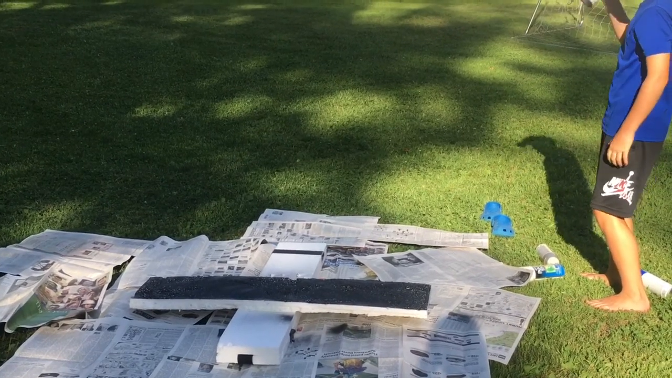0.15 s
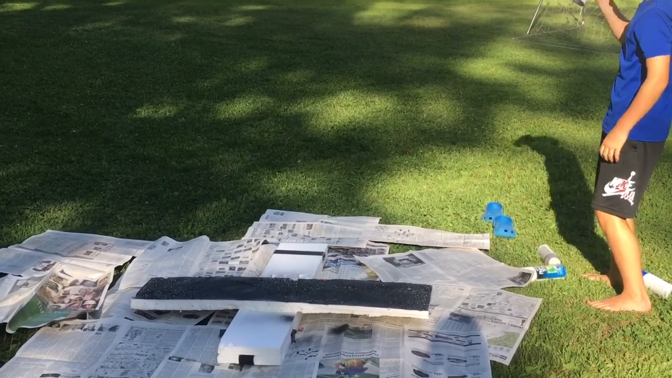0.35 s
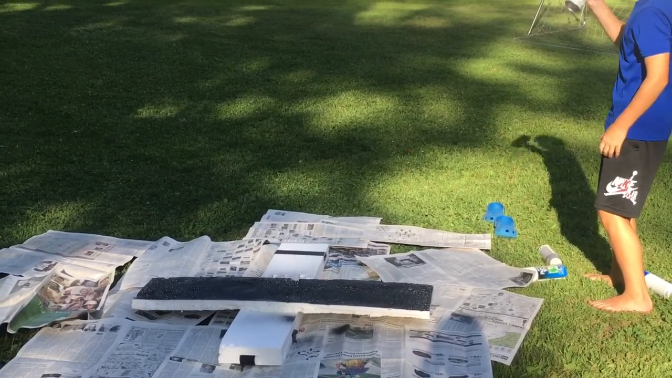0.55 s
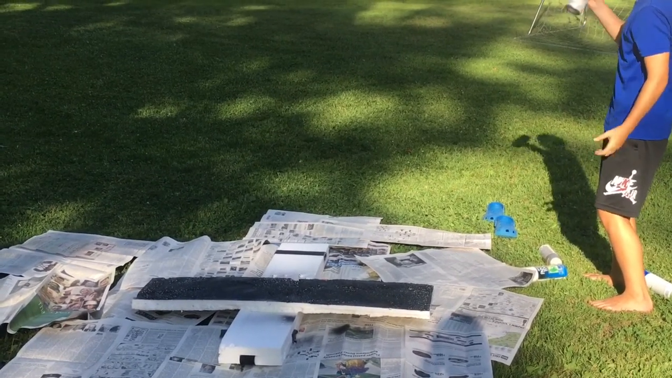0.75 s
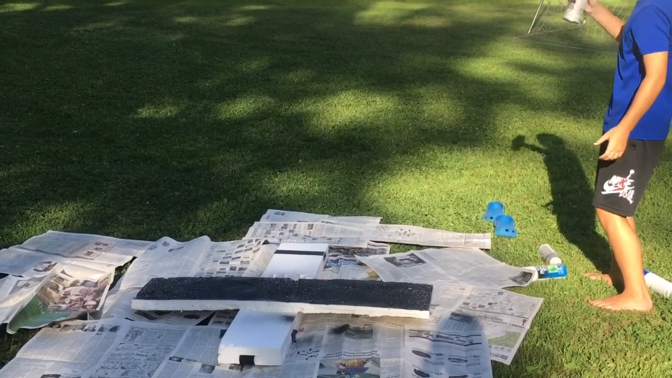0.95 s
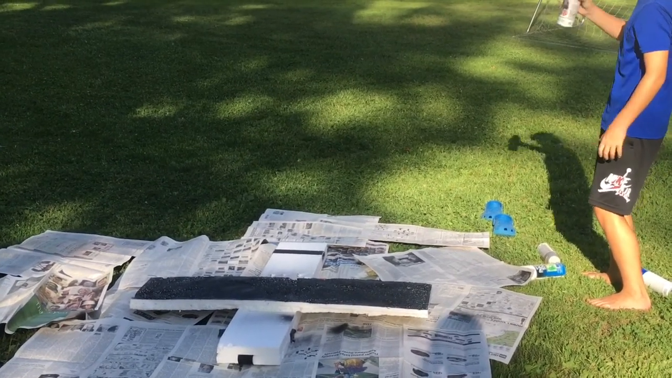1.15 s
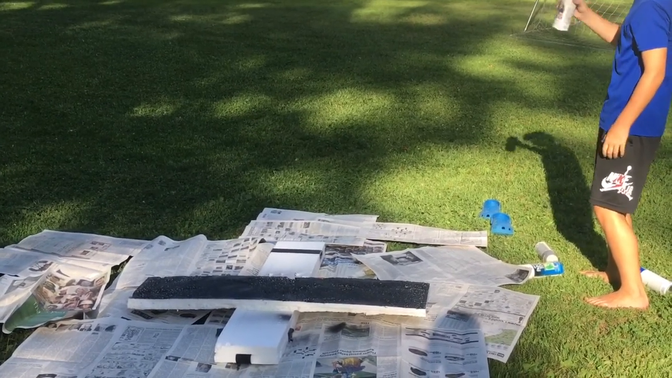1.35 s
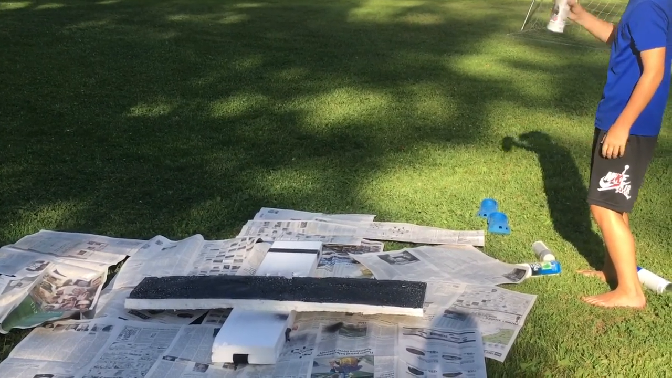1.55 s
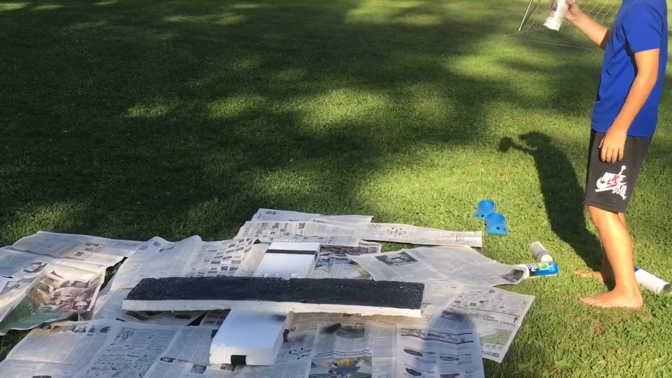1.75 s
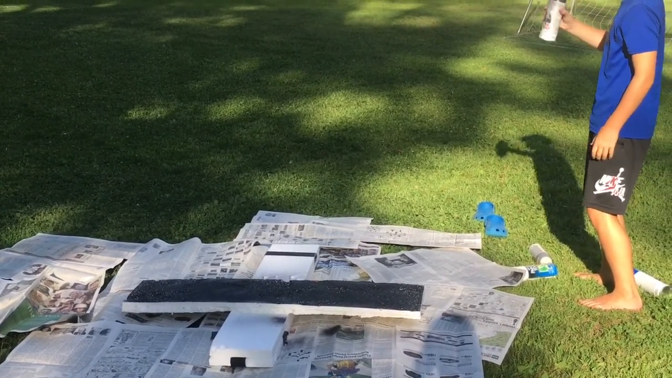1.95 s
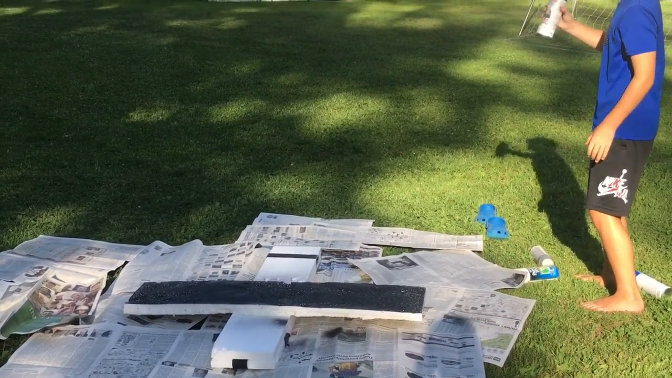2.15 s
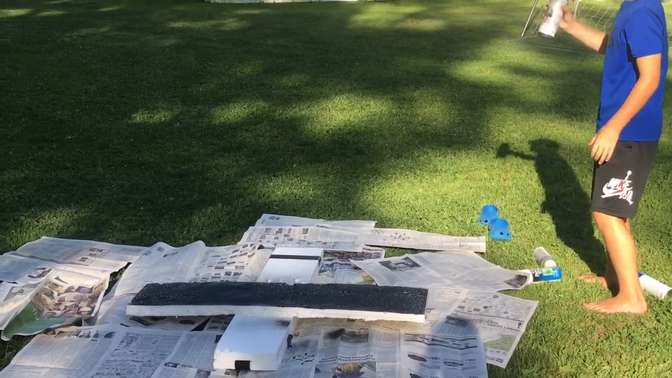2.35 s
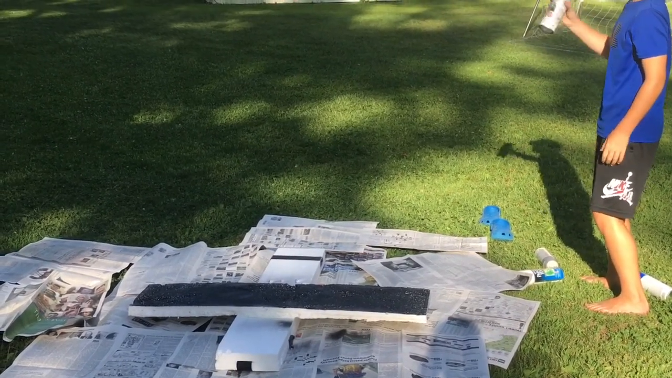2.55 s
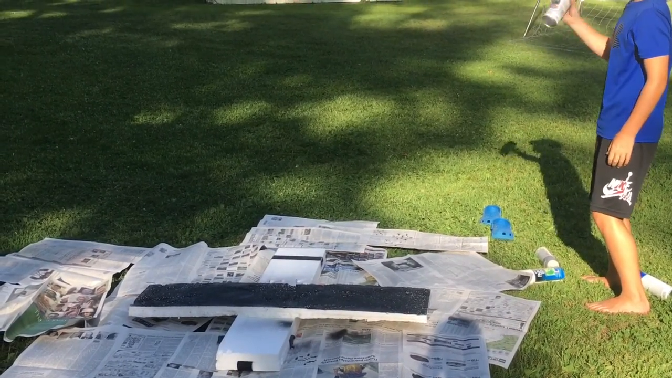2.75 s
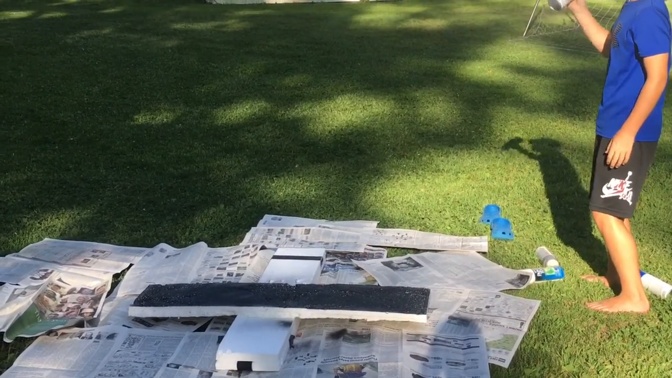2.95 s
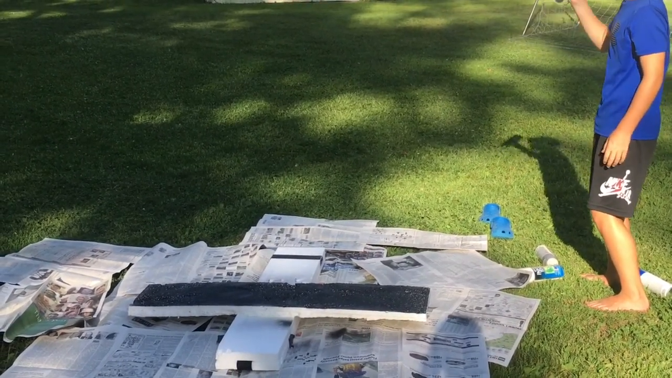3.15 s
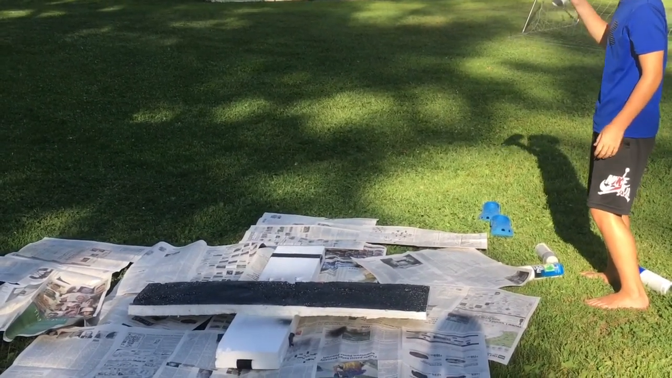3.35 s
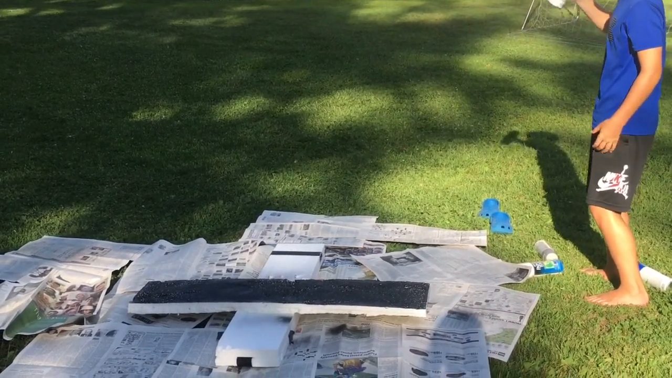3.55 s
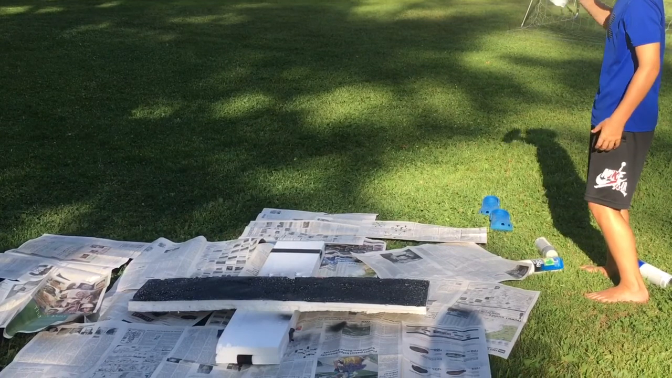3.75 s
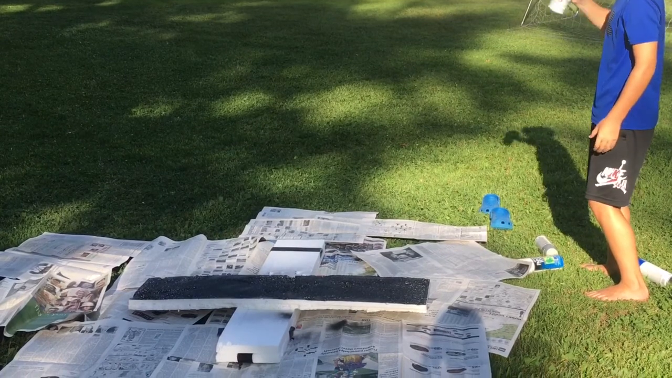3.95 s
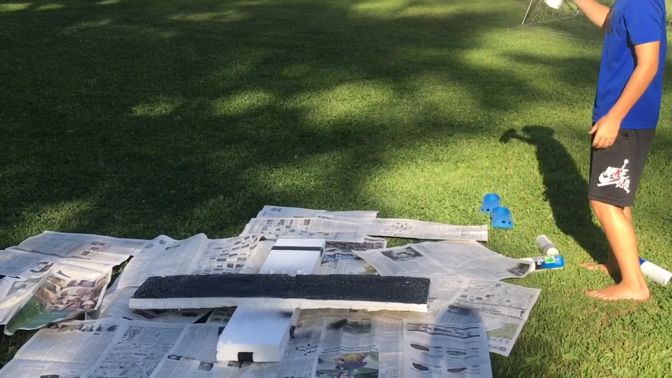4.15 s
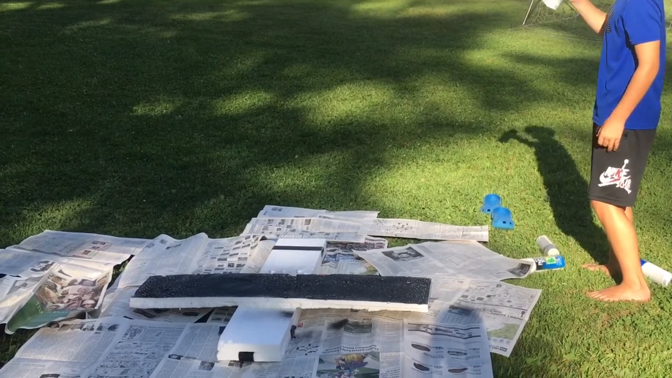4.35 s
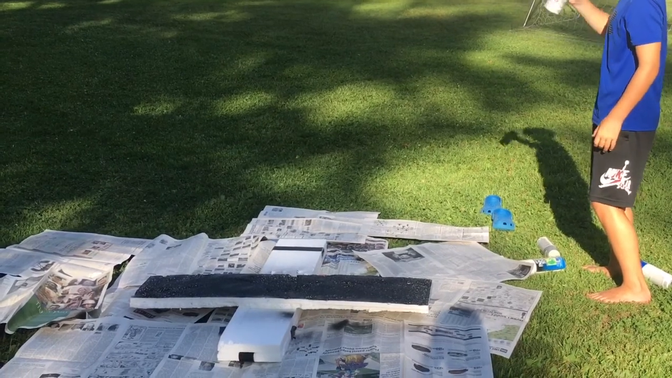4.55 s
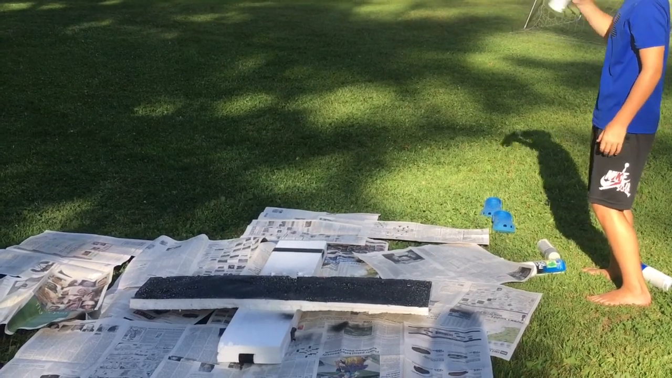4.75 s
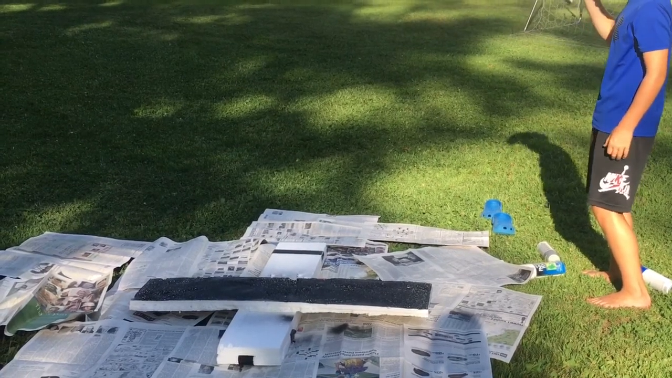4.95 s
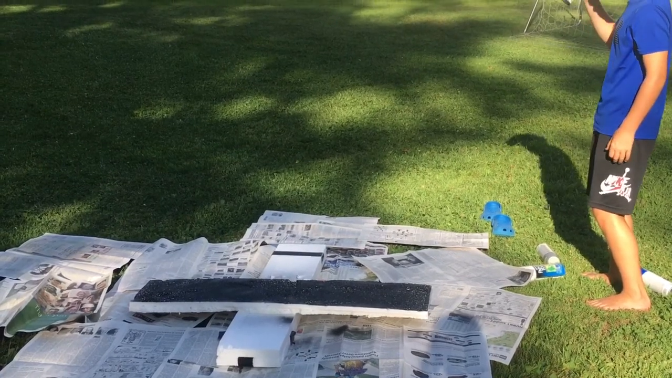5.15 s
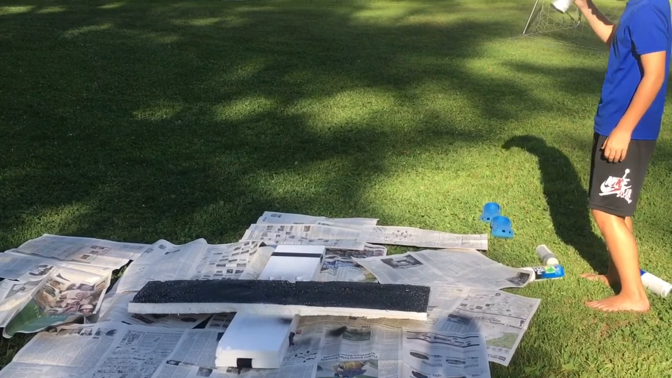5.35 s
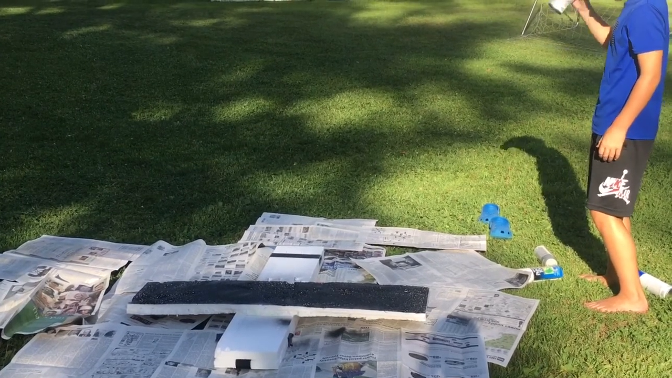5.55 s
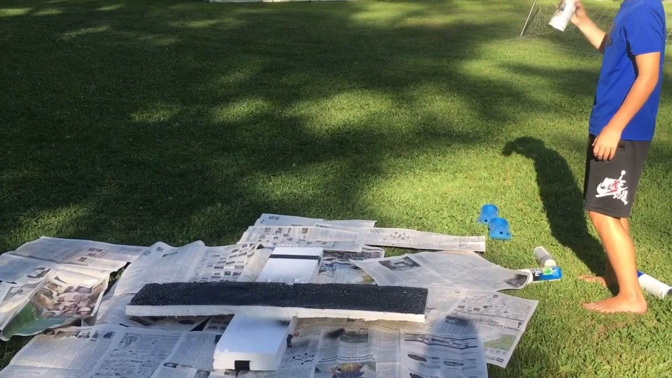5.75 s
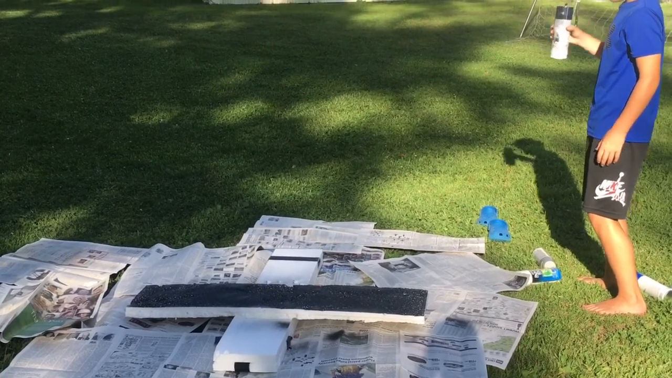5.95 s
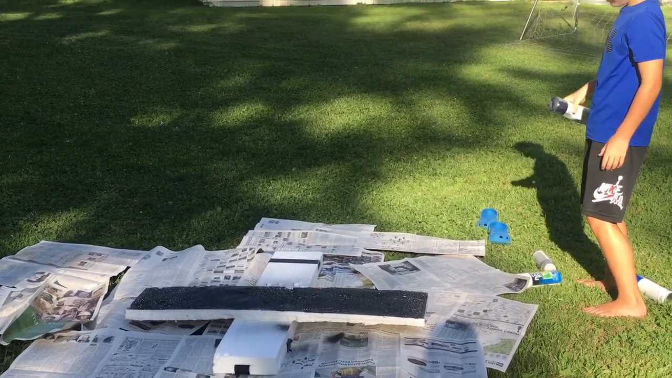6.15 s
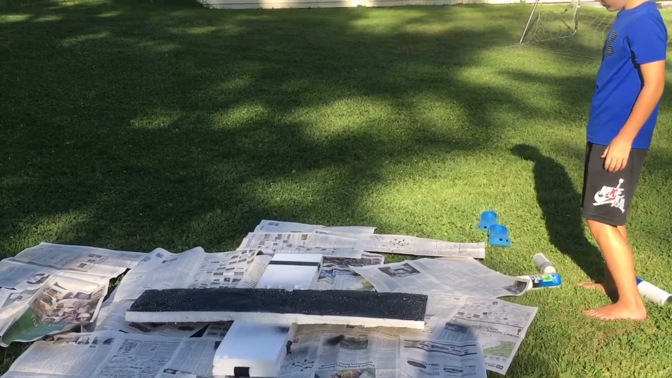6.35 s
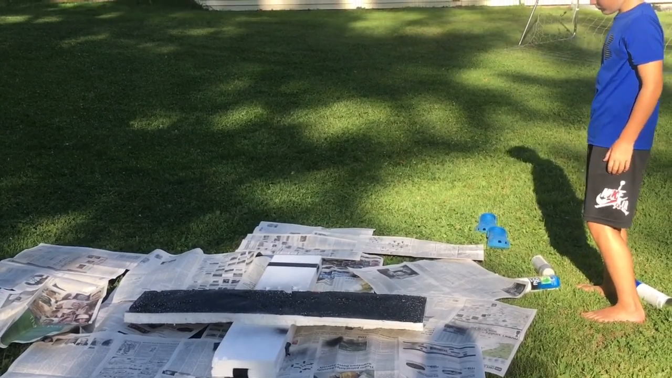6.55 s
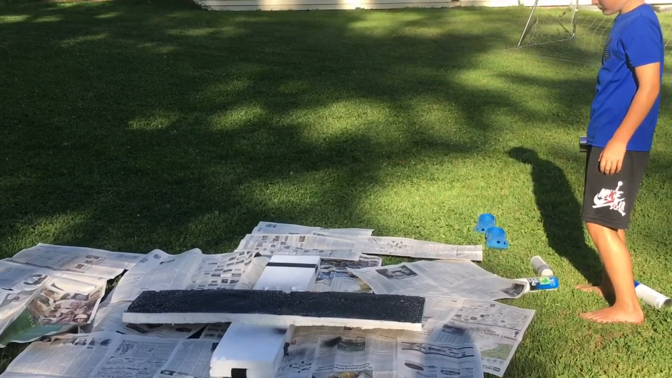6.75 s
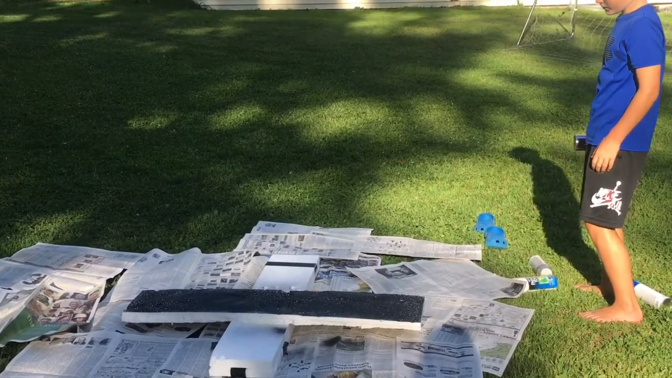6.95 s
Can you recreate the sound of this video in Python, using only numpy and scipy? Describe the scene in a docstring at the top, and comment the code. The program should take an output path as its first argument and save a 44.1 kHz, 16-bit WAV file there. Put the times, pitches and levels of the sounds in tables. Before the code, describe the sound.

Rapid metallic clacking of a mixing ball in a shaken paint can on a lawn, thinning out to quiet garden air and cricket chirps.

```python
"""In a garden, a spray paint can is shaken hard over a lawn; the knocks thin out and a last one follows alone.
The loose ball excites the can's damped modes: it cracks on the base, skips along the wall and knocks
into the shoulder, and each knock returns as an echo off the ground. It also rolls round the wall.
Paint sloshes as filtered bubble bursts, with fizz and spatter of shaped noise. A cricket chirps in sagging
tones, one soft peep sounds, and a machine's wavering sines hum far away in soft noise."""
import sys
import numpy as np
from scipy import signal
from scipy.fft import rfft, irfft
from scipy.io import wavfile
from scipy.ndimage import uniform_filter1d

SR = 44100
rng = np.random.default_rng(int(sys.argv[2]) if len(sys.argv) > 2 else 0)


def wrap_up_sound(samples):
    """Save the sound to the file named by the first command line argument, as 16-bit audio."""
    columns = np.atleast_2d(samples).T
    # keep every value between -1 and 1, then stretch to whole-number steps
    tamed = np.clip(columns, -1, 1)
    steps = np.round(tamed * 32767).astype(np.int16)
    wavfile.write(sys.argv[1], SR, steps)


N = 312669
TIME = np.arange(N) / SR

# Modes of the can: (mean frequency [Hz], relative level [dB], 60 dB decay time [s])
CAN_MODES = [(461, -13.5, 0.013), (1034, -5, 0.019), (1410, 4, 0.0085), (1676, 3, 0.0096),
             (1925, 2, 0.0059), (2350, 6, 0.01), (2723, -6, 0.019), (3130, 2.5, 0.0092), (3600, -3, 0.013),
             (3870, -2, 0.014), (4450, -17.5, 0.025), (5210, -3.5, 0.014), (6510, 13, 0.0034),
             (7170, 1.5, 0.015), (8380, 2.5, 0.0022), (9730, -6, 0.0084), (11260, 2.5, 0.0024),
             (13900, -8, 0.0034), (15800, 6.5, 0.00043)]
# Borders between wall, shell ring, dome, rim and tick zones of the spectrum: (frequency [Hz])
ZONE_EDGES_HZ = [400, 1800, 2800, 5200, 8000, 16000]
# Forward strokes, ball on the domed base; dome and tick are relative to the shell ring:
# (time [s], level [dB], end dome [dB], steel tick [dB], ground echo lag [ms])
BASE_CRACKS = [(.0108, -21, 2.5, -5, 2.4), (.3438, -27.5, -6.5, -13.5, 2.04), (.539, -28, -10.5, -11, 2.09),
               (0.753, -31.5, -5.5, -9, 2), (.953, -27.5, -6, -14.5, 2.35), (1.2908, -21, 4.5, -4.5, 2.3),
               (1.5182, -21.5, 1, -3, 2.3), (1.702, -21, -4, -7.5, 2.37), (1.9108, -20.5, 6, -10.5, 2.17),
               (2.1628, -26, 8, 2, 2.3), (2.348, -20, 6, 4, 2), (2.5385, -20.5, 0, -2, 2.32),
               (2.7878, -23.5, 6, -6.5, 2.77), (3.0007, -24.5, -1.5, -7.5, 2.5), (3.2077, -25, 4.5, 0, 2.7),
               (3.4045, -21.5, -5, -2.5, 2.43), (3.4104, -24.5, 3, -11, 2.44),
               (3.6356, -19, 4.5, -2.5, 2.5), (3.864, -18, 7, -6, 2.73), (4.0665, -19.5, 9, 3, 1.63),
               (4.7425, -25, -4, -4, 2.44), (4.9173, -21, 2.5, -16, 2.6), (5.1373, -22, 8.5, 3.5, 1.87),
               (5.3757, -33, -4, -16, 2.8), (5.5472, -19.5, 3, 1, 2.31), (6.8934, -40.5, -2, -2, 2.15)]
# Return strokes, ball into the shoulder: (time [s], level [dB], wall flex relative to the shell ring [dB])
SHOULDER_KNOCKS = [(0.1034, -26, 1), (1.1585, -32, -2), (1.395, -32, 6), (1.6132, -31, 0),
                   (1.8085, -26.5, 6), (2.0118, -31.5, 9), (2.2413, -28, 4.5), (2.4561, -30.5, 1),
                   (2.653, -27, 1), (2.873, -27.5, 4.5), (3.0936, -29.5, 5.5), (3.3304, -33.5, 2),
                   (3.521, -28.5, -2), (3.7505, -29.5, -2), (3.973, -28.5, 4.5), (4.223, -33.5, -5),
                   (4.4281, -33.5, -2.5), (4.6382, -31, -4), (4.8268, -30.5, .5), (5.0361, -31, 2.5),
                   (5.252, -34.5, 2), (5.4684, -31.5, 0), (5.6793, -34, 0)]
# Rebounds of the ball just after hard base cracks, and glances off the side wall, dull in mid wall and bright
# near the base: (time [s], level [dB], brightness [dB])
WALL_SKIPS = [(0.0258, -31, 9), (.0411, -36.5, -1), (0.0551, -43, -13), (.064, -39, -12),
              (.0876, -40.5, 24), (.1267, -38, -5), (.18, -44.5, -1), (.318, -42, -22), (0.328, -41.5, -4),
              (.514, -43.5, -24), (.765, -43, -10), (.8487, -43, -4), (.9687, -38, -8), (1.1944, -39.5, -2),
              (1.348, -33, -9), (1.3673, -42.5, 19), (1.4028, -39, -9), (1.447, -47, -5),
              (1.5267, -31.5, 10), (1.5586, -33.5, -10), (1.5948, -40.5, 8), (1.619, -35, -12),
              (1.7139, -30, 16), (1.7788, -42.5, 3), (1.8841, -40, -3), (1.9073, -29, 3), (1.9864, -37, 27),
              (1.997, -43, 1), (2.0867, -43.5, -2), (2.2809, -41, -7), (2.318, -43.5, 6), (2.38, -44, -1),
              (2.401, -45.5, -4), (2.4245, -35.5, 23), (2.5482, -27.5, 6), (2.615, -41.5, 7),
              (2.6237, -41, 7), (2.7285, -42, -1), (2.845, -41.5, -8), (2.864, -39, 12),
              (2.9488, -39.5, -3), (2.969, -44.5, -5), (3.0648, -38.5, 0), (3.0772, -39, 18),
              (3.1524, -38, -9), (3.1699, -43, 6), (3.2358, -30, 12.5), (3.2652, -33.5, -7),
              (3.2852, -45.5, 16), (3.3655, -41, -10), (3.423, -41, 8), (3.481, -41, 5), (3.5038, -38, 0),
              (3.5373, -42, -1), (3.712, -40.5, 12), (3.7984, -36.5, -4), (3.8756, -37.5, 10),
              (3.9112, -41, -16), (3.9404, -39.5, 13), (4.1088, -35, -6), (4.1424, -34.5, 7),
              (4.1642, -42, -4), (4.177, -42.5, -4), (4.2545, -44.5, -16), (4.4775, -42, -1),
              (4.5328, -40.5, -11), (4.7059, -44, -2), (4.819, -43.5, -2), (4.8906, -40.5, -6),
              (4.9929, -38.5, 8), (5.112, -45, 5), (5.1264, -37, -10), (5.1702, -29.5, 16),
              (5.214, -40.5, 19), (5.3532, -35.5, 2), (5.4138, -44.5, -11), (5.4491, -42.5, -15),
              (5.4946, -42.5, -2), (5.5396, -35, -7), (5.563, -28.5, 5), (5.6004, -39.5, -8),
              (5.6235, -37.5, 20), (5.6392, -42.5, 1), (5.754, -47, 3), (5.851, -49.5, -8),
              (5.9992, -42.5, 7), (6.0178, -45.5, -22), (6.068, -48, -8), (6.0953, -50.5, -14),
              (6.9702, -51.5, -3)]
# Ball rolling round the wall on the slower turns: (start [s], length [s], level [dB])
ROLLS = [(0, 0.2, -61), (0.205, 0.078, -55.5), (0.316, 0.15, -46), (0.5, 0.072, -56), (0.582, 0.071, -58),
         (0.743, .06, -50), (0.813, 0.13, -52), (.96, 0.045, -50), (1.04, 0.11, -63), (1.979, .05, -51),
         (2.37, .08, -57), (4.138, 0.091, -63)]
# Paint kept in motion, before the surges of each stroke: (time [s], level [dB])
SLOSH_LEVEL = [(0, -54), (.4, -54.5), (1.0, -56), (1.25, -58.5), (2.0, -56), (2.9, -59), (3.7, -57),
               (4.2, -55), (4.72, -66), (5.05, -55), (5.65, -57), (5.88, -67), (7.09, -104)]
# Spectrum of the sloshing: (frequency [Hz], relative level [dB])
SLOSH_SPECTRUM = [(500, -25), (900, -0.5), (1350, -3), (1800, -7), (2350, -5.5), (2900, -13), (3800, -5.5),
                  (4800, -21.5), (6700, -16), (8200, -19), (11500, -26), (16000, -29)]
# Paint splashing after a turn of the can: (time [s], level [dB])
SPLASHES = [(.36, -50), (.56, -61), (.97, -61), (6.91, -64)]
# First wing stroke of each cricket chirp: (time [s])
CHIRP_TIMES = [.25, .515, .833, 1.115, 1.385, 1.685, 1.94, 2.216, 2.513, 2.82, 3.10, 3.428, 3.778, 4.11,
               4.368, 4.728, 5.025, 5.345, 5.68, 5.968, 6.217, 6.557, 6.85]
# Partials of the distant hum: (mean frequency [Hz], mean level [dB])
HUM_PARTIALS = [(58.4, -60), (77, -74), (107.4, -62), (176, -75), (214.6, -72.5), (2697, -73)]
# Spectrum of the open air: (frequency [Hz], relative level per Hz [dB])
AIR_SPECTRUM = [(20, -37), (32, -20), (50, 6), (110, -1.5), (140, -3), (220, -3.5), (300, -4.5), (400, -13),
                (680, -10.5), (790, -3.5), (950, -1), (1220, -9.5), (1450, -15), (2200, -14), (2600, -17.5),
                (3000, -18.5), (4100, -23.5), (5000, -16), (6000, -20.5), (6500, -29), (7400, -26.5),
                (8400, -23.5), (10200, -36), (11500, -34.5), (15500, -38)]


def ball(place_db=1.5, detune=0.026, crack_db=-5.5, tick_t60_s=0.0026, crack_low_hz=900,
         ground_db=-5.0, ground_hz=5000, rim_db=-2.0, rim_lean=0.084, tick_trim_db=-3, tick_lean=0.35):
    """Modal excitation: the place of impact decides which zones of the can's modes speak."""
    impacts = np.vstack([base_cracks(), shoulder_knocks(), wall_skips(), stray_taps()])
    start_s, level_db, wall_db, dome_db, tick_db, lag_ms = impacts.T
    t = np.arange(2048) / SR
    hz, mode_db, t60_s = np.transpose(CAN_MODES)
    shape = (len(start_s), len(hz))
    sign = (-1) ** np.arange(len(hz))  # neighbouring modes swing opposite ways
    strength = sign * gain_of(mode_db + place_db * rng.standard_normal(shape))
    pitch = hz * (1 + detune * rng.standard_normal(shape))  # the moving paint loads the steel
    grit = rng.standard_normal((len(start_s), len(t)))

    # a blow on the end puts its treble into the stiff rim, a blow on the side into a thin tick
    end_on_db = np.clip(dome_db - wall_db, -8, 18)
    rim_zone_db = tick_db + rim_db + rim_lean * end_on_db
    tick_zone_db = tick_db + tick_trim_db - tick_lean * end_on_db
    zones_db = [wall_db, 0 * level_db, dome_db, rim_zone_db, tick_zone_db]
    crack_t60s = [.009, .006, .006, tick_t60_s, tick_t60_s]
    rings = 0
    for lo, hi, zone_db, crack_t60 in zip(ZONE_EDGES_HZ, ZONE_EDGES_HZ[1:], zones_db, crack_t60s):
        in_zone = np.flatnonzero((hz >= lo) & (hz < hi))
        modes = sum(strength[:, [k]] * np.sin(2 * np.pi * pitch[:, [k]] * t) * decay(t, t60_s[k])
                    for k in in_zone)
        modes = band(modes, .75 * lo, 1.5 * hi)  # each part of the can radiates only its own range
        crack = band(grit * decay(t, crack_t60), max(lo, crack_low_hz), hi)  # countless damped modes
        zone = even(even(modes) + gain_of(crack_db) * even(crack))
        rings = rings + gain_of(zone_db)[:, None] * zone

    # the echo off the lawn comes a little later, and grass swallows its treble
    f = np.fft.rfftfreq(len(t), 1 / SR)
    delay = np.exp(-2j * np.pi * f * lag_ms[:, None] / 1000)
    echo = gain_of(ground_db) * delay / (1 + (f / ground_hz) ** 2)
    knocks = even(irfft(rfft(rings) * (1 + echo)))
    out = np.zeros(N)
    gains = gain_of(level_db) * np.sqrt(SR / 100)  # level is the rms over 10 ms
    for start, gain, knock in zip(start_s, gains, knocks):
        add(out, start, gain * knock)
    return out


def base_cracks(wall_db=-7.5):
    """Stiffness: the base hardly flexes the wall; the squarer the hit, the more dome and tick."""
    rows = np.array(BASE_CRACKS)
    return blows(rows, wall_db, *rows[:, 2:].T)


def shoulder_knocks(dome_db=-3.5, tick_db=-4.0, follow=0.57, lag_ms=2.128):
    """Coupled flexure: dome and thin tick partly follow the flexing wall in a hollow knock."""
    rows = np.array(SHOULDER_KNOCKS)
    wall_db = rows[:, 2]
    return blows(rows, wall_db, dome_db + follow * wall_db, tick_db + follow * wall_db, lag_ms)


def wall_skips(wall_db=-1.0, dome_db=-3.0, tick_db=-10, wall_share=0.52, lag_ms=2.32,
               usual_db=-39, soft_flex=0.24):
    """Point of excitation: nearer the base, the dome takes over from the wall."""
    rows = np.array(WALL_SKIPS)
    level_db, bright_db = rows[:, 1], rows[:, 2]
    flex_db = soft_flex * (usual_db - level_db)  # softer touches favour the other zones over the ring
    skip_wall_db = wall_db + flex_db - wall_share * bright_db
    skip_dome_db = dome_db + flex_db + (1 - wall_share) * bright_db
    return blows(rows, skip_wall_db, skip_dome_db, tick_db + flex_db, lag_ms)


def stray_taps(count=14, end_s=5.2, level_db=-48, spread_db=3.0, wall_db=3.0, dome_db=-3,
               tick_db=-8, colour_db=4, lag_ms=2.2):
    """Random impacts: faint chance touches of the loose ball, one in each equal span of time."""
    start_s = (np.arange(count) + rng.random(count)) * end_s / count
    size, wall, dome = rng.standard_normal((count, 3)).T
    rows = np.column_stack([start_s, level_db + spread_db * size])
    return blows(rows, wall_db + colour_db * wall, dome_db + colour_db * dome, tick_db, lag_ms)


def blows(rows, wall_db, dome_db, tick_db, lag_ms):
    """Impact description: (time [s], level [dB], wall, dome, tick against the ring [dB], echo lag [ms])."""
    return np.column_stack(np.broadcast_arrays(rows[:, 0], rows[:, 1], wall_db, dome_db, tick_db, lag_ms))


def spatter(knocks, spatter_db=-9, spatter_t60_s=0.05):
    """Dispersed impacts: each knock flings paint against the wall, a brief, very high fizz."""
    t = np.arange(SR // 5) / SR
    envelope = decay(t, spatter_t60_s) * (1 - decay(t, 0.0028))
    drops = even(rng.standard_normal(len(t)) * envelope)
    treble = band(knocks, 9000, 15500)
    return knocks + gain_of(spatter_db) * signal.fftconvolve(treble, drops)[:N]


def garden(x, near_db=-21, near_t60_s=0.016, far_db=-32, far_t60_s=.45, far_hz=6000):
    """Scattering: body and ground close by, then a faint tail from trees and walls."""
    t = np.arange(SR // 2) / SR
    near, far = rng.standard_normal((2, len(t))) * (1 - decay(t, 0.0053))
    near = even(band(near * decay(t, near_t60_s), 700, 16000))
    far = even(band(far * decay(t, far_t60_s), 400, far_hz, order=1))
    return x + signal.fftconvolve(x, gain_of(near_db) * near + gain_of(far_db) * far)[:N]


def rolling(contacts_per_s=700, spread_db=2.0, waver_db=5.0, low_hz=950, high_hz=2700):
    """Rolling contact: dense soft touches ring the wall; each roll swells and dies away."""
    swell = np.zeros(N)
    for start, length, db in ROLLS:
        add(swell, start, gain_of(db) * np.sqrt(np.hanning(int(length * SR))))
    contacts = np.convolve(patter(contacts_per_s, spread_db), can_ring())[:N]
    return swell * gain_of(waver_db * walk(70)) * unit(band(contacts, low_hz, high_hz))


def can_ring():
    """Impulse response: all modes of the can after one light touch."""
    t = np.arange(512) / SR
    return sum((-1) ** k * gain_of(db) * np.sin(2 * np.pi * hz * t) * decay(t, t60)
               for k, (hz, db, t60) in enumerate(CAN_MODES))


def paint(slosh_db=0, churn_db=3.0, graze_db=-7, grazes_per_s=40, splash_rise_s=0.016):
    """Bubble acoustics: tiny bubbles burst in the paint, the ball grazes the wall, splashes fizz."""
    motion = gain_of(paint_motion() + churn_db * walk(45))
    edges_hz = 500 * 2 ** (np.arange(16) / 3)  # third octaves
    bubbles = 0
    for lo, hi in zip(edges_hz, edges_hz[1:]):
        bursts_per_s = 110 * max(lo / 2500, 1) ** 2  # small, high bubbles are far more numerous
        bubbles = bubbles + np.sqrt(lo) * unit(band(patter(bursts_per_s, 3.5), lo, hi))
    grazes = unit(band(np.convolve(patter(grazes_per_s, 3), can_ring())[:N], 900, 4200))
    splash = np.zeros(N)
    age = np.arange(SR // 4) / SR / splash_rise_s
    for start, db in SPLASHES:
        add(splash, start, gain_of(db) * age * np.exp(1 - age))
    fizz = splash * unit(band(patter(900, 2.5), 6100, 7300))
    slosh = gain_of(slosh_db) * colour(bubbles, SLOSH_SPECTRUM)
    return motion * (slosh + gain_of(graze_db) * grazes) + fizz


def paint_motion(forward_db=6, return_db=3, lag_s=.007, length_s=0.031):
    """Inertia: the level [dB] of the paint surges at the end of the can just behind the ball."""
    time_s, db = np.transpose(SLOSH_LEVEL)
    forward = forward_db * surges(BASE_CRACKS, lag_s, length_s)
    back = return_db * surges(SHOULDER_KNOCKS, lag_s, length_s)
    return np.interp(TIME, time_s, db) + forward + back


def surges(rows, lag_s, length_s):
    """Lagged response: a swell from 0 to 1 and back, cresting just after each end of a stroke."""
    out = np.zeros(N)
    for row in rows:
        add(out, row[0] + lag_s - length_s / 2, np.hanning(int(length_s * SR)))
    return out


def cricket(wing_hz=5090, stroke_s=.037, stroke_width_s=0.0043, droop_hz=330, chirp_db=-55.5):
    """Stridulation: three wing strokes to a chirp; the tone sags as each stroke slows."""
    out = np.zeros(N)
    t = np.arange(-SR // 50, SR // 50) / SR  # 0 at the crest of a stroke
    sag = droop_hz * (np.maximum(t, 0) / 0.0073) ** 2
    for start in CHIRP_TIMES:
        for k, stroke_db in enumerate([-2, 1, 0]):
            hz = wing_hz * (1 + 0.0055 * rng.standard_normal()) - sag
            tone = np.sin(2 * np.pi * np.cumsum(hz) / SR) / np.cosh(t / stroke_width_s) ** 1.1
            add(out, start + k * stroke_s + t[0], gain_of(stroke_db + chirp_db) * tone)
    return out


def far_peep(at_s=6.28, half_length_s=0.03, hz=2550, db=-62):
    """Narrow-band noise: one soft, blurred peep from far away under a bell-shaped envelope."""
    tone = unit(band(rng.standard_normal(N), hz - 90, hz + 90))
    return gain_of(db) * tone * np.exp(-((TIME - at_s) / half_length_s) ** 2)


def outdoors(air_db=-56.5, swell_db=0.5, waver_db=2.0, drift_hz=0.23):
    """Superposition: soft far-off neighbourhood noise and the wavering hum of a machine."""
    air = colour(rng.standard_normal(N), AIR_SPECTRUM)
    # the mean level is set on the 300 Hz to 16 kHz band
    air = air * gain_of(air_db + swell_db * walk(3)) / np.std(band(air, 300, 16000))
    hum = 0
    for hz, db in HUM_PARTIALS:
        level = np.sqrt(2) * gain_of(db + waver_db * walk(5.5))
        hum = hum + level * np.sin(2 * np.pi * np.cumsum(hz + drift_hz * walk(5.97)) / SR)
    return air + hum


def gain_of(db):
    """Logarithmic level: decibels to amplitude gain."""
    return 10 ** (np.asarray(db) / 20)


def decay(t, t60_s):
    """Exponential damping: fall by 60 dB in t60_s seconds."""
    return np.exp(-np.log(1000) * t / t60_s)


def unit(x):
    """Power normalisation: scale to rms 1."""
    return x / np.sqrt(np.mean(x ** 2))


def even(x):
    """Energy normalisation: scale each row to energy 1."""
    return x / np.linalg.norm(x, axis=-1, keepdims=True)


def band(x, lo_hz, hi_hz, order=2):
    """Band-pass filtering, causal."""
    edges_hz = [lo_hz, min(hi_hz, SR / 2 - 1000)]
    return signal.sosfilt(signal.butter(order, edges_hz, "band", fs=SR, output="sos"), x)


def colour(x, points):
    """Spectral shaping by points of (frequency [Hz], level [dB]), scaled to rms 1."""
    hz, db = np.transpose(points)
    f = np.maximum(np.fft.rfftfreq(N, 1 / SR), 1)
    return unit(irfft(rfft(x) * gain_of(np.interp(np.log(f), np.log(hz), db)), N))


def walk(rate):
    """Low-pass randomness: smooth chance of spread near 1, from `rate` fresh values a second."""
    k = max(int(SR / rate), 1)
    steps = np.repeat(rng.standard_normal(N // k + 1), k)
    return unit(uniform_filter1d(uniform_filter1d(steps, k), k)[:N])


def patter(per_s, spread_db):
    """Shot noise: randomly timed impulses, most small and a few large."""
    sizes = gain_of(spread_db * np.minimum(rng.exponential(size=N), 3.5)) * rng.choice([-1, 1], N)
    return sizes * (rng.random(N) < per_s / SR)


def add(out, start_s, sound):
    """Superposition: mix a short sound in at start_s seconds."""
    i = int(np.clip(start_s * SR, 0, N - 1))
    out[i:i + len(sound)] += sound[:N - i]


def scene():
    """Superposition of the can, the paint and the background of the garden."""
    can = garden(spatter(ball())) + rolling() + paint()
    background = cricket() + far_peep() + outdoors()
    return (can + background)[None]


def record(dry, top_hz=15800):
    """Low-pass filtering: the recorder cuts the top of the treble steeply."""
    return signal.sosfilt(signal.ellip(8, .2, 80, top_hz, fs=SR, output="sos"), dry)


dry = scene()
out = record(dry)
wrap_up_sound(out)
```